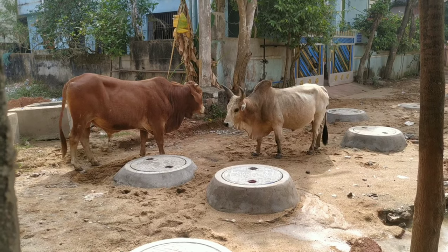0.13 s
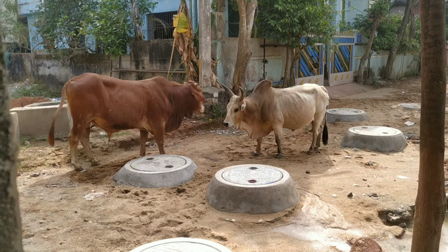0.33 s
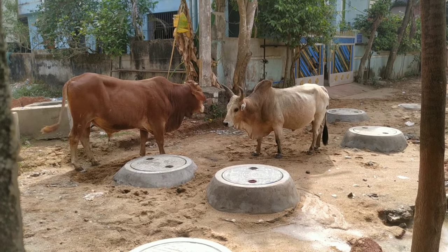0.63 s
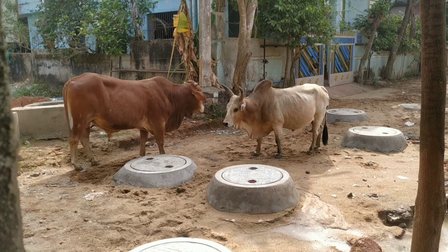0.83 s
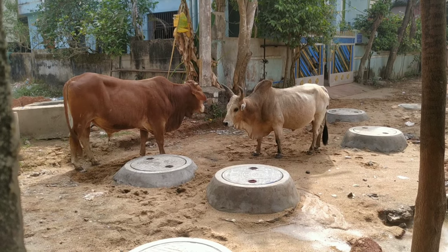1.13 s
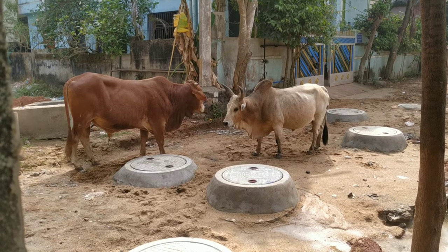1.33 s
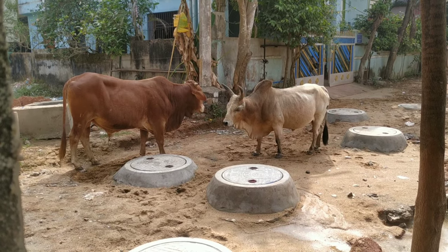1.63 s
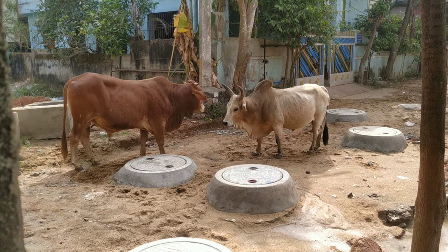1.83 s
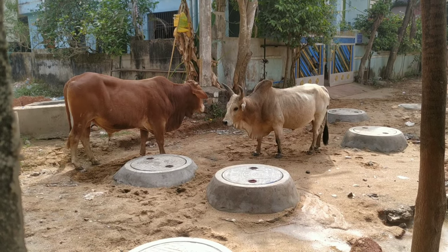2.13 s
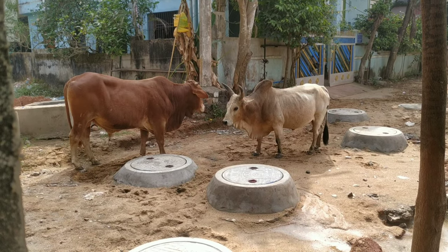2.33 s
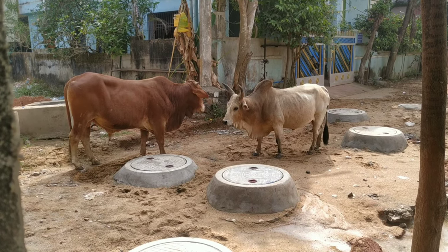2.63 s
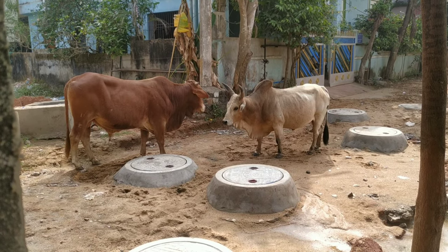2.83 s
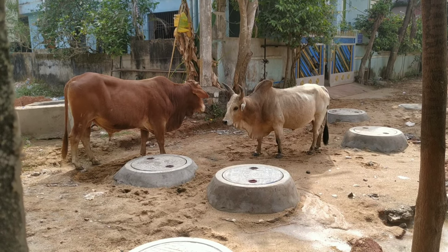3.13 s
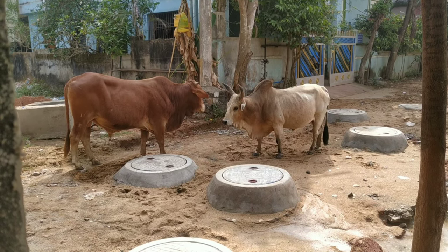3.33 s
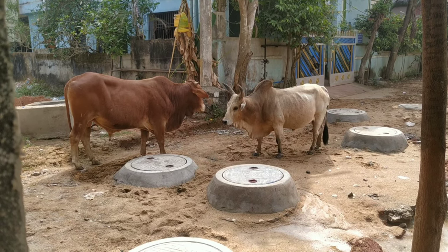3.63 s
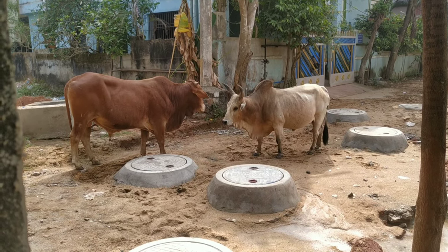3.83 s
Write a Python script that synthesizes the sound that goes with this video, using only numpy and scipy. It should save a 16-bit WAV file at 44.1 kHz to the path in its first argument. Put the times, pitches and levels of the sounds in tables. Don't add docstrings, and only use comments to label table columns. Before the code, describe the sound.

A bull's deep, hoarse bellow sounds from the start until about 0.75 s, while a bird gives rapid rising whistles, then a buzzy higher trill at 0.63-0.73 s. A dry snap and soft knocks follow, with dull yard echoes. Until 3 s only low wind, faint insects and leaf rustles remain. Then a low groan swells, rising in pitch to a rough full cry by 3.8-4 s, ending abruptly.

```python
import sys
import numpy as np
from scipy import signal
from scipy.io import wavfile
from scipy.ndimage import uniform_filter1d

SR = 44100
rng = np.random.default_rng(int(sys.argv[2]) if len(sys.argv) > 2 else 0)


def unload_audio(sound):
    columns = np.transpose(np.atleast_2d(sound))
    steps = np.round(np.clip(columns, -1, 1) * 32767)
    wavfile.write(sys.argv[1], SR, steps.astype(np.int16))


def linear_from_db(decibels):
    return 10 ** (np.asarray(decibels, float) / 20)


N = 176400


def seconds():
    return np.arange(N) / SR


def rms_one(x):
    return x / np.sqrt(np.mean(x ** 2) + 1e-20)


def tracks(table, t):
    s, *columns = np.transpose(table)
    return [np.interp(t, s, c) for c in columns]


def at_hz(points, hz):
    points = np.array(points)
    return np.interp(np.log(hz), np.log(points[:, 0]), points[:, 1])


def drift(rate_hz):
    r = np.exp(-40 * np.pi * rate_hz / SR)
    slow = signal.lfilter([1], [1, -2 * r, r * r], rng.standard_normal(N // 20 + 3002))[3000:]
    return np.interp(np.arange(N) / 20, np.arange(len(slow)), rms_one(slow))


def filtered(x, order, edges_hz, kind):
    return signal.sosfilt(signal.butter(order, edges_hz, kind, fs=SR, output="sos"), x)


def resonance(x, hz, width_hz):
    r = np.exp(-np.pi * width_hz / SR)
    poles = [1, -2 * r * np.cos(2 * np.pi * hz / SR), r * r]
    return signal.lfilter([(1 - r * r) / 2, 0, (r * r - 1) / 2], poles, x + 1e-18)


def double_resonance(x, hz, width_hz):
    return resonance(resonance(x, hz, width_hz), hz, width_hz)


def gliding(x, hz, width_hz):
    turn, r = np.exp(2j * np.pi * np.cumsum(hz) / SR), np.exp(-np.pi * width_hz / SR)
    return 2 * np.real(turn * signal.lfilter([(1 - r) ** 2], [1, -2 * r, r * r], x / turn))


# [f/Hz, likeness 0-1]
LIKENESS = [(60, 0.98), (380, 0.93), (2380, 0.13), (15000, 0.44)]


def banded(spectrum, patchy_db):
    white = rng.standard_normal((2, 2, N))
    edges_hz = 20 * 2 ** np.arange(0, 10, .5)
    out = 0
    for k, (low, high) in enumerate(zip(edges_hz, np.minimum(edges_hz[1:], .45 * SR))):
        mid, side = filtered(white[k % 2], 2, [low, high], "band")
        hz = np.sqrt(low * high)
        alike = np.clip(at_hz(LIKENESS, hz), 0, 1)
        stereo = np.sqrt(1 + alike) * mid + np.sqrt(1 - alike) * side * [[1], [-1]]
        out = out + linear_from_db(at_hz(spectrum, hz) + patchy_db * drift(8)) * stereo
    return rms_one(out)


# [f/Hz, level/dB per Hz]
AIR_SPECTRUM = [(20, -5.5), (64, -6), (186, -15.5), (353, -30), (429, -18), (567, -24.5), (1300, -29.5),
                (6960, -35.5), (15600, -35)]
AIR_DB, AIR_SINK_DB_PER_S = -46.5, 0.6


def air():
    return linear_from_db(AIR_DB - AIR_SINK_DB_PER_S * (seconds() - 2)) * banded(AIR_SPECTRUM, patchy_db=0.5)


INSECT_HZ, INSECT_WIDTH_HZ, INSECT_DB = 6590, 1100, -59


def insects():
    white = rng.standard_normal((2, N)) + .6 * rng.standard_normal(N)
    band = double_resonance(white, INSECT_HZ, INSECT_WIDTH_HZ)
    return linear_from_db(INSECT_DB + 1.9 * drift(30)) * rms_one(band)


CRICKET_HZ, CRICKET_DB = 3500, -66


def cricket():
    note = resonance(rng.standard_normal((2, N)), CRICKET_HZ, 40)
    return linear_from_db(CRICKET_DB + 5.0 * drift(1.5)) * rms_one(note)


# [t/s, peak level/dB, rise/s, fall/s]
RUSTLES = [
    (0.581, -42, 0.058, 0.073),
    (1.034, -47.5, 0.04, 0.028),
    (1.2, -43, 0.051, .15),
    (1.527, -45.5, .02, .12),
    (2.41, -41, 0.013, 0.05),
    (2.548, -49.5, .015, 0.14),
    (2.87, -43.5, 0.045, 0.11),
    (3.44, -48.5, .03, 0.12),
    (3.92, -45.5, 0.018, .07),
]
# [f/Hz, level/dB per Hz]
RUSTLE_SPECTRUM = [(880, -32.5), (1500, -14), (3880, -1), (5310, -12.5), (9020, 0.5), (15600, -8)]


def rustles():
    t, swell = seconds(), 0
    for s, db, rise, fall in RUSTLES:
        before = np.clip(1 + (t - s) / rise, 0, 1)
        after = np.exp(-np.maximum(t - s, 0) / fall)
        swell = swell + linear_from_db(db) * np.where(t < s, before, after)
    return swell * banded(RUSTLE_SPECTRUM, patchy_db=2.0)


# [t/s, peak level/dB, f/Hz, decay/s]
TICKS = [
    (.9133, -38, 1800, .0008),
    (.79, -44, 470, .015),
    (1.69, -46, 450, .02),
]


def ticks():
    out, t = np.zeros(N), np.arange(4000) / SR
    for s, db, hz, decay in TICKS:
        start = int(s * SR)
        out[start:start + len(t)] += linear_from_db(db) * np.exp(-t / decay) * np.sin(2 * np.pi * hz * t)
    return out


def whistle(hz, envelope):
    return envelope * np.sin(2 * np.pi * np.cumsum(hz) / SR)


BIRD_ECHO_S, BIRD_ECHO_DB = .017, -11


def echoed(x):
    return x + linear_from_db(BIRD_ECHO_DB) * np.roll(x, int(BIRD_ECHO_S * SR))


# [t/s, peak level/dB, hold/s]
RISES = [
    (.024, -5, .01),
    (.18, -5, .012),
    (.335, -5, .024),
    (.49, -4, .006),
]
# [t/s, peak level/dB]
ARCHES = [
    (.128, -11),
    (.281, -11),
    (.439, -10),
]
RISE_HZ, RISE_TOP_HZ, RISE_S = 1560, 2480, .022
ARCH_HZ, ARCH_TOP_HZ, ARCH_S = 1590, 1870, .044


def bird():
    t, out = np.arange(SR) / SR, np.zeros(N)
    for s, db, hold in RISES:
        u = np.clip((t - s) / RISE_S, 0, 1)
        attack = np.clip((t - s) / .005, 0, 1)
        release = np.clip((s + RISE_S + hold - t) / .005, 0, 1)
        hz = RISE_HZ + (RISE_TOP_HZ - RISE_HZ) * (1 - (1 - u) ** 1.4)
        out[:SR] += whistle(hz, linear_from_db(db) * (.45 + .55 * u ** 1.6) * attack * release)
    for s, db in ARCHES:
        arch = np.sin(np.pi * np.clip((t - s) / ARCH_S, 0, 1))
        arch = np.maximum(arch, 0)
        out[:SR] += whistle(ARCH_HZ + (ARCH_TOP_HZ - ARCH_HZ) * arch ** 5, linear_from_db(db) * arch ** .8)
    return echoed(out)


TRILL_S, TRILL_LEN_S, TRILL_DB, TRILL_BEAT_HZ = .628, .105, -11, 63
TRILL_HZ, TRILL_END_HZ, TRILL_SAG_S = 3900, 3230, .024


def trill():
    u = np.clip(seconds() - TRILL_S, 0, TRILL_LEN_S)
    beat = .56 - .44 * np.cos(2 * np.pi * TRILL_BEAT_HZ * (u + .001))
    alternate = 1 + .35 * np.cos(np.pi * TRILL_BEAT_HZ * (u - .035))
    uneven = linear_from_db(1.5 + 1.5 * drift(150))
    arch = np.abs(np.sin(np.pi * (u / TRILL_LEN_S) ** 0.83)) ** 0.92
    hz = TRILL_END_HZ + (TRILL_HZ - TRILL_END_HZ) * np.exp(-u / TRILL_SAG_S) + 67.0 * drift(55)
    return echoed(whistle(hz, linear_from_db(TRILL_DB) * beat * alternate * uneven * arch))


JITTER, SPREAD, LOW_SPREAD = .014, .45, 1.7


def fold_pulses(hz, rough, top_hz, span):
    phase = 2 * np.pi * np.cumsum(hz * (1 + JITTER * rough * drift(80)[span])) / SR
    pulses = 0
    for k, lag in enumerate(SPREAD * rng.standard_normal(60), 1):
        lag = lag * (LOW_SPREAD if k < 10 else 1)
        pulses = pulses + np.cos(k * phase + lag) * (k * hz < top_hz)
    return rms_one(pulses), phase


# [start/s, end/s, rate/Hz, depth 0-1]
FLUTTER = [
    (.14, .28, 62, .3),
    (.32, .56, 66, .16),
    (.66, .74, 60, .4),
    (3.49, 3.56, 65, .22),
    (3.67, 3.72, 70, .35),
    (3.84, 4.02, 74, .35),
]


def flutter(t, span):
    depth = sum(d * np.clip(np.minimum(t - a, b - t) / .022, 0, 1) for a, b, rate, d in FLUTTER)
    rate_hz = tracks([((a + b) / 2, rate) for a, b, rate, d in FLUTTER], t)[0]
    return depth, 2 * np.pi * np.cumsum(rate_hz) / SR + .4 * drift(20)[span]


# [t/s, f/Hz, depth 0-1]
NOSE = [(3.05, 1860, 0), (3.4, 1630, 0.09), (3.5, 1427, 0.2)]


def through_nose(source, t):
    s, *columns = np.transpose(NOSE)
    hz, depth = [np.interp(t, s, c, left=c[-1]) for c in columns]
    return source + np.clip(depth, 0, 1) * np.interp(t - .5 / hz, t, source)


# [t/s, f/Hz, level/dB]
BRANCH = [(3.1, 2210, -34.5), (3.2, 2030, -25), (3.3, 2000, -11), (3.38, 1910, -16.5), (3.48, 1770, -14.5),
          (3.62, 1390, -1.5), (3.72, 1480, -33)]
BRANCH_WIDTH_HZ, WANDER_DB, TREBLE_WANDER_DB = 170, 1.2, 1.2
FILLED_FROM_HZ = 2800


def through_throat(source, throat, mouth, t, span):
    voice = 0
    for k, (hz, width_hz, *levels_db) in enumerate(throat):
        db = np.interp(mouth, [0, .5, 1], levels_db)
        db = db + WANDER_DB * (.6 if hz > 1400 else 1) * drift(7)[span]
        db = db + TREBLE_WANDER_DB * (hz > 1400) * drift(25)[span]
        sign = (-1) ** (k * (hz < FILLED_FROM_HZ))
        voice = voice + sign * linear_from_db(db) * double_resonance(source, hz, 1.5 * width_hz)
    branch_hz, branch_db = tracks(BRANCH, t)
    return voice + linear_from_db(branch_db) * gliding(source, branch_hz, BRANCH_WIDTH_HZ)


SHIMMER_DB, BREATH_LOW_HZ = 1.5, 1450
RELEASE_S, FLUTTER_LINE_DB = 0.0075, -7.5


def bellow(rows, throat, top_hz, breath_db, pitch=None):
    first_s, last_s = rows[0][0], rows[-1][0]
    span = slice(int(first_s * SR) * (first_s > 1), min(N, int((last_s + 0.042) * SR)))
    t = seconds()[span]
    db, hz, rough, mouth = tracks(rows, t)
    rough = np.clip(rough, 0, 1)
    if pitch is not None:
        hz = tracks(pitch, t)[0]
    pulses, phase = fold_pulses(hz, rough, top_hz, span)
    depth, beat = flutter(t, span)
    breath = filtered(rng.standard_normal(N)[span], 2, BREATH_LOW_HZ, "high")
    breath = linear_from_db(breath_db) * np.sqrt(rough + .15) * breath * (1 + .7 * np.cos(phase))
    source = (1 + depth * np.sin(beat)) * pulses * linear_from_db(SHIMMER_DB * rough * drift(70)[span]) + breath
    voice = through_throat(through_nose(source, t), throat, mouth, t, span)
    voice = signal.sosfilt(signal.ellip(10, .5, 60, top_hz, fs=SR, output="sos"), voice)
    low = filtered(voice, 4, [200, 1400], "band")
    even = np.sqrt(uniform_filter1d(low ** 2, size=1800, mode="reflect") + 1e-9)
    under = linear_from_db(FLUTTER_LINE_DB) * depth * np.sin(2 * phase - beat * np.where(hz > 180, 1.5, 1))
    release_db = -60 * np.clip(t - last_s, 0, 1) / RELEASE_S / 2
    out = np.zeros(N)
    out[span] = (voice / even + under) * linear_from_db(db + release_db)
    return out


# [t/s, level/dB, roughness 0-1, mouth opening 0-1]
BELLOW_A = [(.02, -13.5, 0.23, 0.2), (.096, -16, 0.23, 0.39), (.19, -15, 0.45, 0.49), (.29, -15, 0.21, 0.6),
            (.329, -13, 0.54, 0.69), (.531, -13, 0.28, 0.93), (.569, -14.5, .1, 0.66),
            (.699, -20.5, .39, 0.83), (.73, -29.5, 0.31, 1)]
CHEST_HZ, CHEST_DB = 61.2, -26.5


def chest():
    s, level_db = np.transpose(BELLOW_A)[:2]
    db = CHEST_DB + np.interp(seconds(), s, level_db, right=-90) + 1.7 * drift(10)
    return whistle(CHEST_HZ * (1 + 0.1 * drift(19)), linear_from_db(db))


# [t/s, f/Hz]
PITCH_A = [(.03, 154.8), (.095, 159.6), (.2, 157.5), (.3, 159.6), (.333, 163.3), (.48, 165.3), (.6, 160.2),
           (.69, 155), (.73, 147)]
# [t/s, level/dB, f/Hz, roughness 0-1, mouth opening 0-1]
BELLOW_B = [(3.005, -64, 97.27, 0.4, 0.05), (3.04, -46.5, 99.33, 0.7, 0.22), (3.1, -39, 104.2, 0.5, 0.2),
            (3.16, -30.5, 113.1, 0.4, 0.21), (3.26, -29, 127.2, .3, 0.17), (3.4, -22.5, 147.1, 0.4, 0.32),
            (3.49, -18.5, 156.6, 0.2, 0.4), (3.53, -19.5, 156, 0.3, 0.62), (3.58, -17.5, 158.9, 0.2, 0.6),
            (3.639, -20, 163.1, .1, 0.42), (3.692, -16, 169.7, 0.88, 0.7), (3.731, -14.5, 171.9, 0.053, 0.83),
         (3.803, -12, 173.9, 0.039, 0.96), (3.836, -13, 178.6, .1, 0.94), (3.848, -14.5, 188.2, 0.56, 0.82),
         (3.96, -12, 185.1, 0.59, 0.93), (4.0, -9, 182.4, 0.85, 0.83)]
# [f/Hz, width/Hz, level/dB mouth narrow, level/dB half open, level/dB wide]
THROAT_A = [(316, 140, -8.5, -6, -15.5), (638, 93, 11, -8, 7), (985.5, 100, 5.5, 4, 3.5),
            (1194, 130, -8.5, 2, -6.5), (1640, 250, -6.5, -8, -2.5), (2124, 203, -10, 1, -5.5),
            (2366, 200, -23, -11, -8), (2714, 110, -16, -2.5, -6.5), (3190, 250, -18, -13, -12.5),
            (3874, 220, -24, -15, -14.5), (3996, 73, -24, -19.5, -17.5), (4550, 260, -25.5, -17.5, -11.5),
            (5690, 900, -29, -23, -22.5), (6700, 1200, -42.5, -27, -32.5)]
# [f/Hz, width/Hz, level/dB mouth narrow, level/dB half open, level/dB wide]
THROAT_B = [(205.2, 42, 7.5, -13.5, -7.5), (320, 110, -24.5, -7, -25.5), (576, 99, -10.5, -6, -3),
            (929, 125, -0.5, -6.5, 9), (1200.6, 106, 2, -2, -4), (1533, 280, -20, -12, -12.5),
            (1998, 110, -23, -10, -17.5), (2228, 96, 1, -10.5, -22), (2758, 370, -13.5, -22, -32),
            (3140, 220, -28, -24.5, -34), (3494, 250, -23, -20.5, -27), (3943, 190, -28, -22.5, -29.5)]


def bull():
    rows_a = [(s, db, 0, rough, mouth) for s, db, rough, mouth in BELLOW_A]
    first = bellow(rows_a, THROAT_A, top_hz=8750, breath_db=1.5, pitch=PITCH_A)
    second = bellow(BELLOW_B, THROAT_B, top_hz=4420, breath_db=6.5)
    return first + second + chest()


YARD_T60_S, YARD_CUT_HZ, FAR_T60_S, FAR_DB = 0.21, 4000, 2.5, -17.5


def yard(x):
    t = np.arange(2 * SR) / SR
    dull = signal.lfilter([1], [1, -np.exp(-2 * np.pi * YARD_CUT_HZ / SR)], rng.standard_normal(2 * SR))
    tail = dull * (linear_from_db(-60 * t / YARD_T60_S) + linear_from_db(FAR_DB - 60 * t / FAR_T60_S))
    return signal.fftconvolve(x, tail / np.sqrt(np.sum(tail ** 2)))[:N]


WIDTH_DB, WIDTH_S = -40, .03


def width(x):
    t = np.arange(4000) / SR
    tail = rms_one(rng.standard_normal(len(t)) * np.exp(-t / WIDTH_S)) / np.sqrt(len(t))
    return linear_from_db(WIDTH_DB) * signal.fftconvolve(x, tail)[:N] * [[1], [-1]]


YARD_BIRD_DB, YARD_BULL_DB, TRILL_WET_DB = -29.5, -28, -1.5
WALL_HZ, WALL_WIDTH_HZ = 1780, 1100


def scene():
    voice, song, last = bull(), bird(), trill()
    middle = voice + song + last
    bird_send = linear_from_db(YARD_BIRD_DB) * (song + linear_from_db(TRILL_WET_DB) * last)
    bull_send = linear_from_db(YARD_BULL_DB) * double_resonance(voice, WALL_HZ, WALL_WIDTH_HZ)
    around = air() + insects() + cricket() + rustles()
    return width(middle) + middle + yard(bird_send + bull_send) + ticks() + around


def band_limit(x):
    return signal.sosfilt(signal.butter(12, 15770, fs=SR, output="sos"), x)


def record(dry):
    fade = np.clip(np.arange(N, 0, -1) / 40, 0, 1)
    mix = np.clip(dry, -1.03, 1.03) * fade
    return band_limit(mix)


dry = scene()
out = record(dry)
unload_audio(out)
```